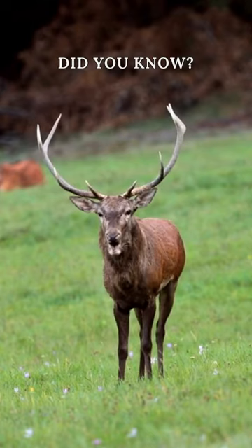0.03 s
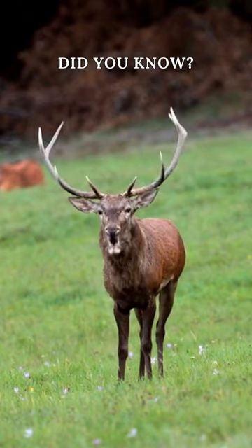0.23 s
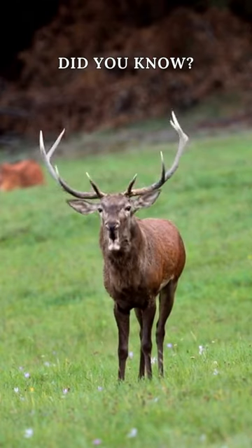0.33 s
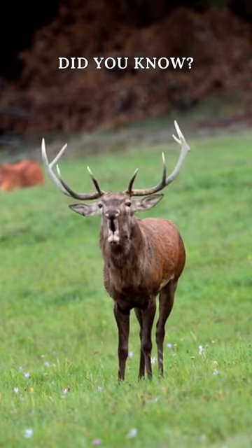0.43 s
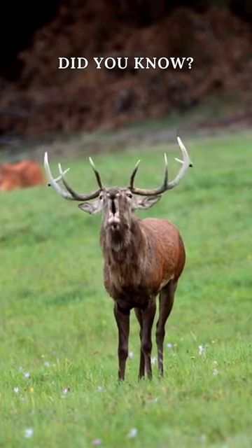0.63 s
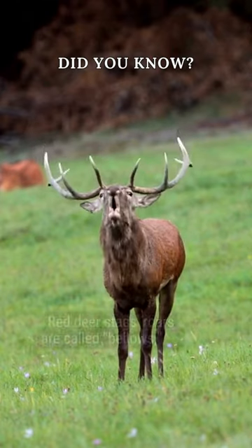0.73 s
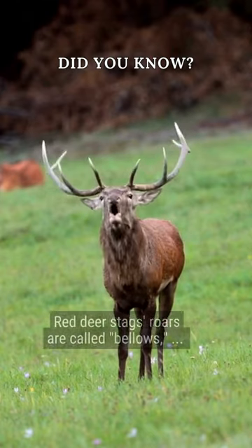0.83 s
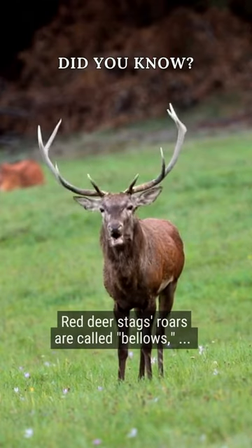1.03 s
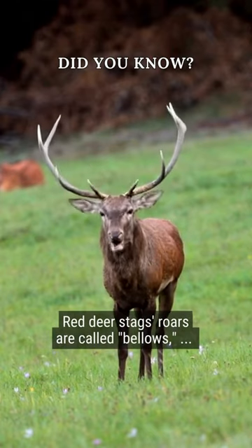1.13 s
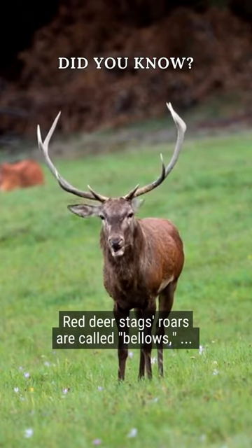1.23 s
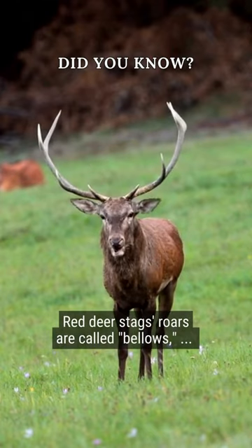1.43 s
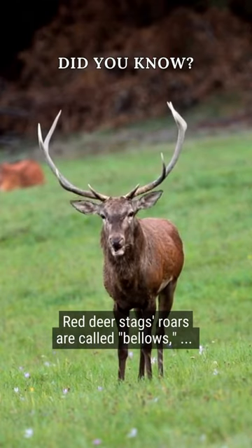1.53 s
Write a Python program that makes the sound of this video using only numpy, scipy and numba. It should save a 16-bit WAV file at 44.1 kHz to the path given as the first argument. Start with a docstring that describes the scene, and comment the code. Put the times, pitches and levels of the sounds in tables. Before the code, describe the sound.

A red deer stag roars once, starting as a low pulsing groan that speeds up and breaks into a harsh rattle. The roar, straight ahead of the microphone, dies away across an open meadow over a faint hiss.

```python
"""A faint hiss with a low ring in it lies over an open meadow; then a red deer stag gives one roar.
Slow, separate pulses of the vocal folds speed up and break into a harsh rattle. The throat filters
this source, and as it lengthens its resonances slide down, with a boom below and a rasp above.
The roar dies away among distant trees."""
import sys
import numpy as np
from scipy import signal
from scipy.fft import rfft, irfft
from scipy.io import wavfile
from numba import njit

SR = 44100
rng = np.random.default_rng(int(sys.argv[2]) if len(sys.argv) > 2 else 0)


def wav_out(sig):
    """Save sig, one row per channel (or a flat mono array), as 16-bit PCM at SR to the path in sys.argv[1]."""
    wavfile.write(sys.argv[1], SR, np.round(np.clip(np.atleast_2d(sig).T, -1, 1) * 32767).astype(np.int16))


N = 70560
TIME = np.arange(N) / SR

# Harshness of the voice, from 0 to 1: time_s, roughness
ROUGHNESS = [(.15, .08), (.4, .18), (.52, .35), (.68, .42), (.75, .55), (.86, .6), (1.0, .55)]


def from_db(db):
    """Amplitude grows tenfold with every 20 dB."""
    return 10 ** (np.asarray(db) / 20)


def rms_one(x):
    """Division by the root mean square gives unit power."""
    return x / np.sqrt(np.mean(x ** 2) + 1e-20)


def curve(rows, t=TIME):
    """Linear interpolation between (time_s, value) points."""
    return np.interp(t, *np.transpose(rows))


def butter(x, hz, kind, order=2):
    """A Butterworth filter has a maximally flat passband."""
    return signal.sosfilt(signal.butter(order, hz, kind, fs=SR, output="sos"), x)


def impulses(times, sizes):
    """Single-sample impulses excite all frequencies alike."""
    out = np.zeros(N) + 1e-18
    np.add.at(out, np.clip(np.round(times * SR).astype(int), 0, N - 1), sizes)
    return out


@njit
def damped_mode(x, pole):
    """A damped oscillator: the pole's angle sets its pitch, the radius its decay."""
    out, state = np.zeros(len(x)), 0j
    for i in range(len(x)):
        state = state * pole[i] + x[i]
        out[i] = state.real
    return out


def resonate(x, hz, width_hz):
    """Resonance with a peak gain near 1: the narrower it is, the longer it rings."""
    radius = np.exp(-np.pi * width_hz / SR)
    return 2 * (1 - radius) * damped_mode(x, radius * np.exp(2j * np.pi * hz / SR) * np.ones(N))


def background_hiss():
    """Spectrally shaped noise wavers faintly under slow, random amplitude modulation."""
    # Background hiss with a low, roar-like ring near 440 and 950 Hz: frequency_hz, relative_db
    spectrum = [(25, -11.5), (55, 2), (100, -5.5), (220, -6), (330, -4), (440, 1.5), (640, -12.5),
                (800, -7), (950, -6), (1150, -12), (1700, -7.5), (2600, -15), (3600, -18.5), (5500, -28),
                (7000, -24.5), (9000, -25), (11000, -19), (12400, -25)]
    level_db, waver_db = -61.5, 1.16
    waver = rms_one(butter(rng.standard_normal(N), 6, "low"))
    hz, db = np.transpose(spectrum)
    bins = np.maximum(np.fft.rfftfreq(N, 1 / SR), 1)
    colour = from_db(np.interp(np.log(bins), np.log(hz), db))
    noise = irfft(rfft(rng.standard_normal(N)) * colour, N)
    return from_db(level_db + waver_db * waver) * rms_one(noise)


def vocal_folds():
    """The voice source: pulses with jitter and shimmer, hard cracks, and turbulence after each pulse."""
    # Beat rate of the folds: time_s, rate_hz
    pulse_rate = [(.14, 42.1), (.21, 59.6), (.35, 58.3), (.43, 61.2), (.51, 83.6), (.65, 98.8),
                  (.77, 118.8), (.82, 126.6), (.88, 111.9), (.92, 131.9), (.95, 84.9), (1.02, 45.5)]
    # Vocal effort as pulse strength: time_s, level_db
    effort = [(.15, -9.5), (.2, -6.5), (.42, -5.5), (.51, -8.5), (.56, -6), (.61, -7.5), (.65, -2.5),
              (.72, -0.5), (.76, -5), (.82, -3), (.875, 2.5), (.92, -2.5), (.945, -8.5), (.98, -1.5),
              (1.02, -18)]
    # Hard cracks that displace any beat close by: start_s, level_db
    cracks = [(.6224, -5), (.7014, 1.5), (.7804, 0), (.8048, -2), (.821, 2), (.8375, -1), (.8703, 5),
              (.8799, 4.5), (.8895, 1.5), (.9124, .5), (.921, 1), (.9735, -2)]
    start_s, end_s, crack_gap_s, puff_decay_s = .1508, 1.02, .004, .005
    jitter_s, shimmer_db = .0008, .5  # at full roughness
    cycles = np.cumsum(curve(pulse_rate) * (TIME >= start_s)) / SR
    beats = np.maximum(TIME[np.searchsorted(cycles, np.arange(int(cycles[-1])))], start_s)
    crack_s, crack_db = np.transpose(cracks)
    clear_of_cracks = np.abs(beats[:, None] - crack_s).min(axis=1) > crack_gap_s
    beats = beats[(beats < end_s) & clear_of_cracks]
    rough = curve(ROUGHNESS, beats)
    jitter, shimmer = rng.standard_normal((len(beats), 2)).T
    beat_db = curve(effort, beats) + shimmer_db * rough * shimmer
    pulses = impulses(beats + jitter_s * rough ** 2 * jitter, from_db(beat_db))
    decay_samples = puff_decay_s * SR
    puff_power = signal.lfilter([1], [1, -np.exp(-1 / decay_samples)], pulses ** 2) / decay_samples
    puffs = np.sqrt(puff_power) * rng.standard_normal(N)
    return pulses, impulses(crack_s, from_db(crack_db)), puffs


def throat(flow):
    """A longer tube resonates lower, so the formants fall; side cavities add antiresonances."""
    # Lengthening of the throat, from 0 to 1: time_s, stretch
    lengthening = [(.15, 0.06), (.35, 0.13), (.5, .48), (.6, .72), (.7, .81), (.8, 0.91), (.92, 0.98),
                   (1.02, 0.97)]
    # Throat resonances: short_hz, long_hz, width_hz, short_db, halfway_db, long_db
    formants = [(370, 319, 72, -20, -23, -5.5), (889, 430, 34.3, -13.5, 3.5, -7.5),
                (991, 728, 36.7, 3, -3.5, -10), (1333, 955.6, 29.5, 5, -1, 5),
                (1643, 1200, 48, 10.5, 0.5, -2.5), (1880, 1602, 64, 7.5, 6, -2),
                (2349, 1480, 21.7, 5, 14.5, 8), (2070, 1915, 72, 1, -16, 4.5),
                (2385, 1705, 64.4, -2.5, 6.5, 7), (2732, 2100, 39.5, -1, 8.5, 6.5),
                (3340, 2410, 46.6, -6, 3.5, 9), (2604, 2300, 30, -8, 3, 2.5),
                (3560, 2770, 37, -40, -12, -3.5), (3670, 3700, 73, -13, -2, -5.5)]
    # Notches from the side cavities of the head: centre_hz, width_hz
    notches = [(1375, 85), (3330, 170)]
    stretch = curve(lengthening)
    voice = np.zeros(N)
    for short_hz, long_hz, width_hz, *levels_db in formants:
        gain = from_db(np.interp(stretch, [0, .5, 1], levels_db))
        voice += resonate(flow * gain, short_hz + (long_hz - short_hz) * stretch, width_hz)
    voice = butter(voice, 3193, "low", order=18)
    voice = butter(voice, 250, "high")
    for hz, width_hz in notches:
        voice -= resonate(voice, hz, width_hz)
    return voice


def boom(flow):
    """The lowest resonance rings at a steady pitch; a second, broad stage steepens its skirts."""
    # Drive of the lowest resonance: time_s, gain_db
    drive = [(.15, -4.5), (.3, -5), (.47, -4.5), (.6, 3), (.69, 1.5), (.74, 4), (.8, 6.5), (.87, 7.5),
             (.92, 11), (.96, 14.5), (1.01, 13)]
    pitch_hz = 194.8
    ring = resonate(flow * from_db(curve(drive)), pitch_hz, width_hz=26.2)
    return resonate(ring, pitch_hz, width_hz=330)


def mouth_rasp(flow):
    """Turbulence and pulses excite high resonances of the open mouth: a thin ring and two rasps."""
    # Drive of each group of modes: time_s, ring_db, lower_db, upper_db
    drive = [(0.149, -21, -40, -31), (.55, -13.5, -27.5, -43), (.67, -15, -26.5, -36.5),
             (0.718, -11.5, -18.5, -22), (0.759, -22, -13.5, -17.5), (.81, -6, -9, -51),
             (0.873, -1.5, -9.5, -21), (.93, -8, -21.5, -22), (1.02, -2, -23, -30)]
    # Mouth resonances in three groups: centre_hz, width_hz, gain_db
    ring_modes = [(3475, 60, 0)]
    lower_modes = [(4573, 730, -3), (4830, 300, -1), (5180, 410, -6.5)]
    upper_modes = [(6450, 310, 3.5), (6930, 410, 5.5), (8970, 730, -10)]
    time_s, *drives_db = np.transpose(drive)
    rasp = np.zeros(N)
    for drive_db, modes in zip(drives_db, (ring_modes, lower_modes, upper_modes)):
        driven = flow * from_db(np.interp(TIME, time_s, drive_db))
        for hz, width_hz, gain_db in modes:
            rasp += from_db(gain_db) * resonate(resonate(driven, hz, width_hz), hz, width_hz)
    return rasp


def stag():
    """Source and filter: the folds drive the airway, and roughness trades pulses for noise."""
    pulses, cracks, puffs = vocal_folds()
    rough = curve(ROUGHNESS)
    return (throat(np.sqrt(1 - rough ** 2) * pulses + rough * puffs + cracks)
            + boom(pulses + rough ** 2 * puffs)
            + mouth_rasp(.5 * pulses + .91 * puffs + .16 * cracks))


def meadow(x):
    """Reflections add to the direct sound: ground scatter, reverberation and a late echo from trees."""
    # Reverberation of the meadow and its trees: centre_hz, level_db, t60_s
    bands = [(108, -7, .7), (214, -16, 1.1), (272, -7, 0.95), (349, 6, 1.63), (513, 0, 2.05),
             (630, 1.5, 1.8), (900, -2.5, 1.14), (1220, -3.5, 1.37), (1340, -12.5, 1.2),
             (2450, -16.5, 1.07), (3150, -7, 0.77), (5900, -3, 0.51), (12000, -5, .5)]
    ground_db, ground_delay_s, ground_decay_s = -10, .0026, .022
    build_s = .01
    trees_db, trees_delay_s, trees_blur_s = -18, .433, .03
    ground = rng.standard_normal(N) * np.exp(-TIME / ground_decay_s) * (TIME > ground_delay_s)
    response = from_db(ground_db) * ground / np.linalg.norm(ground)
    white, bins = rfft(rng.standard_normal(N)), np.fft.rfftfreq(N, 1 / SR)
    centres_hz = [row[0] for row in bands]
    for weights, (_, db, t60_s) in zip(np.eye(len(bands)), bands):
        band = irfft(white * np.interp(bins, centres_hz, weights), N)
        fade = from_db(-60 * TIME / t60_s) * (1 - np.exp(-TIME / build_s))
        response += from_db(db) * band * fade / np.linalg.norm(fade)
    dull_noise = butter(rng.standard_normal(N), [360, 1140], "band")
    trees = dull_noise * np.exp(-((TIME - trees_delay_s) / trees_blur_s) ** 2)
    response += from_db(trees_db) * trees / np.sqrt(trees_blur_s * SR)
    return x + signal.fftconvolve(x, response)[:N]


def treble_width(x, level_db=-12, decay_s=.0052):
    """Decorrelation: a faint, smeared copy of the treble, opposite left and right, adds stereo width."""
    response = rng.standard_normal(N) * np.exp(-TIME / decay_s)
    smeared = signal.fftconvolve(x, response / np.linalg.norm(response))[:N]
    return from_db(level_db) * butter(smeared, 4340, "high", order=16) * np.array([[1], [-1]])


def rustles(half_width_s=.016, grain_db=10):
    """Random amplitude modulation makes noise grainy; its treble is heard in brief swells."""
    # Faint high rustles: peak_s, level_db
    swells = [(0.277, -74), (0.336, -61.5), (0.391, -69), (0.508, -67.5), (1.117, -68.5), (1.539, -64)]
    envelope = sum(from_db(db) * np.exp(-((TIME - peak_s) / half_width_s) ** 2) for peak_s, db in swells)
    grains = rng.standard_normal(N) * from_db(grain_db * rng.standard_normal(N))
    return envelope * rms_one(butter(grains, [7000, 12500], "band"))


def scene():
    """Superposition of roar and background, straight ahead, with a little stereo width in the treble."""
    roar = meadow(stag())
    return roar + treble_width(roar) + background_hiss() + rustles()


def record(dry):
    """An elliptic low-pass filter cuts the top steeply."""
    cutoff_hz = 12500
    return signal.sosfilt(signal.ellip(12, .1, 80, cutoff_hz, fs=SR, output="sos"), dry)


dry = scene()
out = record(dry)
wav_out(out)
```